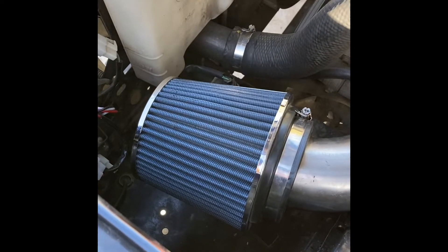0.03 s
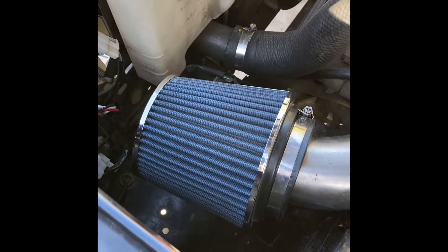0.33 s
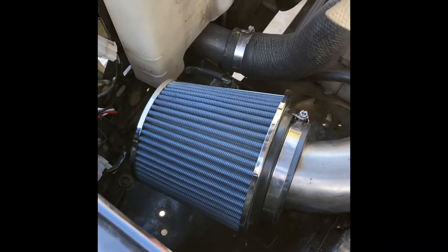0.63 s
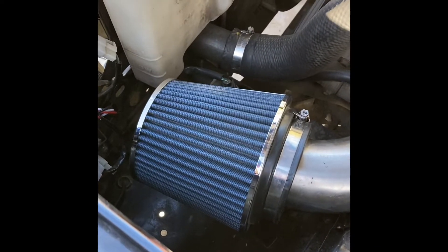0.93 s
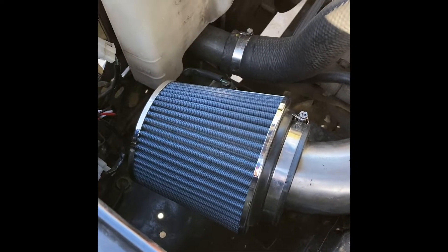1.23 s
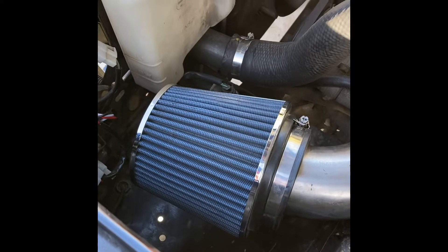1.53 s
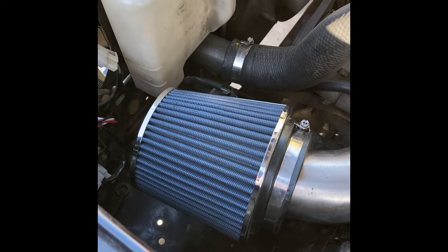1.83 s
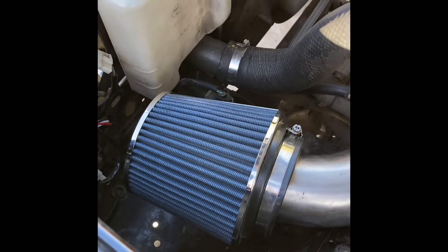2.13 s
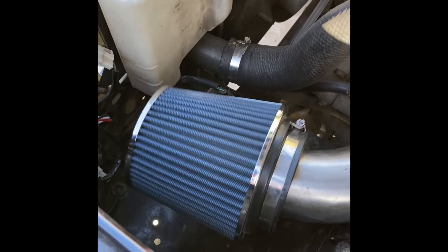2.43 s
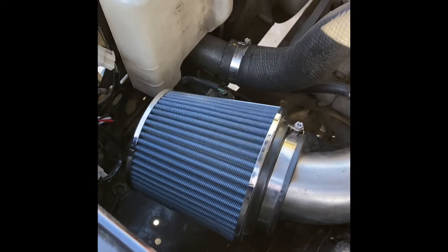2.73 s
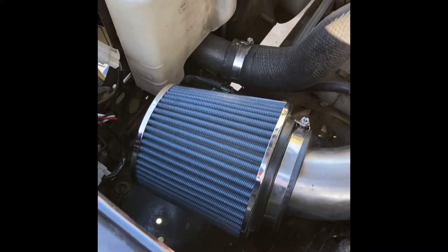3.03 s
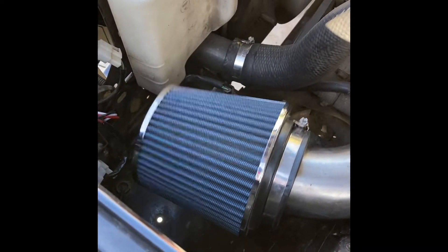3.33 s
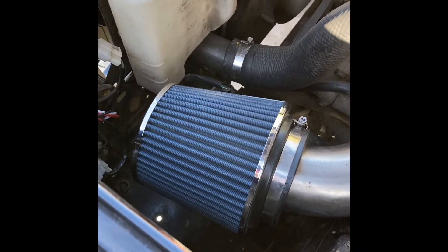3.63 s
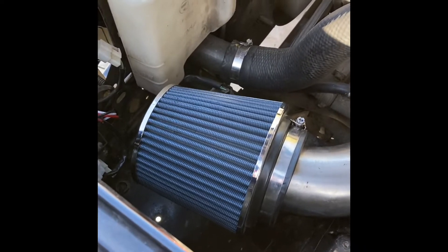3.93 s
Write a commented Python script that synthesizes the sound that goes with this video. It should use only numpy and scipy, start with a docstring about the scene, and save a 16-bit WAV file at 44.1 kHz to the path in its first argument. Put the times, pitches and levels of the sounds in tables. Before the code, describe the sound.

A turbocharged car engine revs four times, its intake fluttering after each throttle release.

```python
"""Turbo engine, four blips

In the engine bay of a turbocharged four-cylinder, a microphone pair close to the open cone filter.
On the throttle the intake burbles and the rush of air swells; at each lift the compressor surges and
chops the air into a dying run of chuffs, which buffet the microphones and end as soft pipe hoots."""
import sys
import numpy as np
from scipy import signal
from scipy.fft import rfft, irfft
from scipy.io import wavfile
from scipy.ndimage import uniform_filter1d

SR = 44100
rng = np.random.default_rng(int(sys.argv[2]) if len(sys.argv) > 2 else 0)


def generate_wav(sig):
    """Save sig (samples, or channels by samples) to the path in sys.argv[1] as 16-bit PCM at SR."""
    pcm = np.round(np.clip(np.atleast_2d(sig).T, -1, 1) * 32767).astype(np.int16)
    wavfile.write(sys.argv[1], SR, pcm)


N = 176400
T = np.arange(N) / SR
BINS = np.maximum(np.arange(N // 2 + 1) * SR / N, 1)

# Engine speed. Each row: time in seconds, firing rate in Hz.
FIRING_RATE = [(0.0, 97.3), (0.18, 115.9), (0.33, 141.8), (0.45, 149.4), (0.6, 138.7), (0.85, 120.6),
               (1.15, 106.8), (1.48, 86.2), (1.6, 88.8), (1.75, 103.4), (1.92, 126.7), (2.05, 116.6),
               (2.29, 106.6), (2.52, 130.9), (2.7, 116.8), (3.0, 100.6), (3.1, 109.4), (3.26, 128.8),
               (3.4, 117.8), (3.7, 101.8), (4.0, 87.7)]
# Exhaust hum. Each row: time in seconds, level in dB. Levels in all tables are relative.
EXHAUST_HUM = [(0,-29.5),(.2,-34),(.3,-43),(.45,-34.5),(.7,-42.5),(1.05,-33),(1.25,-41),(1.43,-51),(1.52,-39.5),(1.75,-32),(1.88,-38.5),(1.99,-25),(2.1,-39),(2.42,-38),(2.57,-26),(2.67,-39),(3.05,-34.5),(3.2,-43),(3.31,-24.5),(3.42,-34),(3.7,-46),(4,-53)]
# Open throttle. Each row: opening and shutting in seconds, level in dB, sag in dB per second.
BLIPS = [(-.05,0.502,-25,-39),(1.463,2.04,-29,-11),(2.27,2.609,-32.5,-12),(2.934,3.421,-28.5,-24),(3.963,4.1,-32,-3)]
# The burble swells just before a lift. Each row: time in seconds, gain in dB.
SWELLS = [(1.98,10.3),(2.559,11.7),(3.314,14)]
# Strength of the four intake strokes in dB.
CYLINDER_DB = [2.5, 1.5, -7.5, -9.5]
# Resonances of the intake. Each row: frequency in Hz, width in Hz, level in dB.
TRACT_MODES = [(215,95,-0.5),(267,95,-2.5),(314,77,-7.5)]
PIPE_MODES = [(489,40,2),(594,62,-3),(822,76,-0.5),(972,17,-2),(1212,36,3),(1317,16,2.5),(1632,52,-1.5),(1860,54,-1),(1966,63,0),(2198,20,-2),(2477,46,-3),(2765,36,1.5),(3644,69,-8),(4390,50,-5.5)]
HOOT_MODES = [(442,75,-8),(493,22,-0.5),(582.4,38,-7)]
# When each pipe mode rings. Each row: peak as a share of the chuff's length, spread in seconds.
PIPE_TIMING = [(0.49,0.011),(0.75,0.017),(1.1,0.011),(0.55,0.018),(0.33,0.0057),(1,0.014),(0.31,0.0075),(0.76,0.019),(0.38,0.014),(.65,0.019),(.65,0.0063),(0.76,0.017),(0.43,0.027),(0.25,.014)]
# Air drawn through the filter. Each row: time in seconds, rush in dB, hiss in dB.
SUCTION = [(0,-30.5,-33.5),(.2,-25.5,-28.5),(.45,-22,-28),(.51,-22,-26),(.59,-28.5,-31),(.93,-35,-34.5),(1.07,-29.5,-29.5),(1.3,-30,-34),(1.44,-34,-35.5),(1.5,-37,-40.5),(1.7,-32,-34),(1.97,-25.5,-27.5),(2.09,-28,-25),(2.26,-35.5,-37),(2.37,-29,-31),(2.57,-25.5,-29),(2.75,-28,-29),(2.94,-36.5,-37.5),(3.1,-32.5,-35.5),(3.34,-25,-27.5),(3.44,-29.5,-31),(3.7,-34,-32),(3.85,-34.5,-33),(4,-38,-40.5)]
# Surges back through the filter. Each row: start and length in seconds, body, hiss and puff in dB.
CHUFFS = [(0.51,0.052,-14.5,-16.5,-44),(0.596,0.061,-20.5,-21,-29),(0.686,0.047,-22,-23,-33.5),(0.781,0.04,-24,-25.5,-29),(0.87,0.03,-31,-25.5,-54),(0.964,0.018,-33,-25,-54),
          (2.018,0.042,-16,-18,-29),(2.107,0.038,-20,-21,-30.5),(2.186,0.047,-23.5,-23,-29.5),
          (2.596,0.055,-17.5,-21,-26.5),(2.692,0.033,-17,-19.5,-26.5),(2.778,0.031,-22,-21.5,-22.5),(2.863,0.031,-24.5,-21.5,-34),
          (3.36,0.046,-17.5,-21.5,-32),(3.45,0.04,-20,-20,-26),(3.538,0.038,-25.5,-22.5,-27.5),(3.631,0.021,-27,-22.5,-46),(3.721,0.018,-33.5,-25.5,-57)]
# Hiss as the blades stall ahead of a surge. Each row: start and length in seconds, level in dB.
SPITS = [(0.762,0.017,-27.5),(0.84,0.016,-27),(1.976,0.041,-20.5),(2.558,0.045,-21),(2.676,0.014,-19),(2.754,0.02,-23),(2.828,0.026,-25),(3.32,0.04,-20.5),(3.435,0.013,-21.5),(3.518,0.018,-24),(3.606,.014,-23.5),(3.688,0.012,-28)]
# Yelps as the flow turns round. Each row: peak time in seconds, pitch in Hz, level in dB.
YELPS = [(.57,1097,-10.5),(.656,1010,-14),(.737,884,-20),(.794,997,-18.5),(2.069,973,-15),(2.162,870,-20),(2.655,972,-10.5),(2.738,855,-16),(2.815,790.3,-16.5),(3.411,924,-12.5),(3.552,954,-17)]
# Weak surges that only ring the pipe. Each row: peak time in seconds, level in dB.
HOOTS = [(.89,-34),(0.982,-24.5),(1.061,-27),(1.145,-24.5),(1.225,-46),(2.119,-26),(2.206,-23),(2.702,-24),(2.88,-29.5),(3.664,-28.5),(3.745,-25.5),(3.83,-25),(3.904,-32.5)]
# The turbo's blade note. Each row: time in seconds, pitch in Hz.
WHISTLE_PITCH = [(0,16500),(1,16500),(1.09,14700),(1.276,12800),(1.35,12100),(1.45,11200),(1.54,11700),(1.63,14000),(1.75,17200),(3.7,16200),(3.82,14540),(4,12500)]
# Spectra of the noises. Each row: frequency in Hz, density in dB.
GROWL_COLOUR = [(40,-65),(140,-27),(200,-6),(260,3.5),(310,-6),(380,4),(490,-11.5),(620,-18),(1500,-63)]
RUSH_COLOUR = [(40,-42),(100,-8),(180,3.5),(300,1),(450,3.5),(570,-5.5),(700,-1),(880,1.5),(1050,-3.5),(1300,-6.5),(1550,-3.5),(2000,-2.5),(3000,-5.5),(4000,-10.5),(5000,-10),(9000,-16.5)]
HISS_COLOUR = [(2500,-78),(4500,-4),(5400,-25),(6200,-1),(7500,-1),(8400,2),(9700,3.5),(11000,3),(13000,-4),(15500,-8)]
RUMBLE_COLOUR = [(20,-38),(50,-16),(100,14.5),(170,-13),(250,-5),(340,-6),(470,9),(700,-9),(2000,-4.5),(8000,-50)]
ROAR_COLOUR = [(40,-55),(120,-25),(175,-8),(280,3),(400,-13),(550,-14),(680,4),(900,1),(1050,-10),(3000,-55)]
CHUFF_COLOUR = [(25,-35),(60,-22),(130,2.5),(280,4.5),(380,-4),(600,-3),(740,2),(1100,2.5),(1600,-3),(2200,-4),(3300,-5.5),(4500,-7),(6500,-7),(10000,-47)]
PUFF_COLOUR = [(15,-37),(30,-24),(50,3.5),(85,0.5),(140,-1.5),(250,-9),(400,-9.5),(900,-57)]
SIZZLE_COLOUR = [(3000,-40),(7000,-31),(11000,9),(13500,4.5),(15800,-2)]
# First reflections in the engine bay. Each row: delay in seconds, gain.
BAY_ECHOES = [(0.002177, 0.09), (0.003197, 0.04), (0.003991, 0.03), (0.004966, 0.13), (0.006122, 0.1),
              (0.007211, -0.05), (0.007846, -0.04), (0.008866, -0.028), (0.011, 0.035), (0.0142, 0.058)]
# Phase across the microphone pair. Each row: frequency in Hz, lead of the left in radians.
PAIR_PHASE = [(60,-.2),(250,-.7),(500,-1.5),(800,-2.4),(1100,-3),(1500,-3.6),(1900,-4.5),(2500,-3.9),(3200,-3.6),(4200,-4.3),(5200,-3.14),(5800,-3.1),(6600,-2.4),(7800,-.2),(9200,.1),(10300,1.8),(11300,3.1),(12400,3.2),(13200,4.6),(14000,6.2)]
# Likeness of the turbulence at the two microphones. Each row: frequency in Hz, coherence from 0 to 1.
PAIR_LIKENESS = [(100,1),(500,0.8),(1000,0.83),(1600,0.23),(2100,0.72),(4100,0.51),(5400,1),(6800,0.67),(8400,.995),(10200,1),(11800,1),(13200,0.99),(14500,0.82)]
# Balance of the pair. Each row: frequency in Hz, left minus right in dB.
PAIR_BALANCE = [(100,2),(240,2),(450,-2.5),(1000,-3),(1900,-3.5),(3200,0),(15000,0)]

THROTTLE_S = 0.0075   # how fast the throttle opens and shuts
ROUGH_HZ = 224   # how fast turbulent air flickers in level


def from_db(db):
    """Decibels to gain."""
    return 10 ** (np.asarray(db) / 20)


def rms_one(x):
    """Scale to unit level."""
    return x / np.sqrt(np.mean(x ** 2) + 1e-20)


def in_time(rows):
    """The columns of a curve at every sample."""
    times, *columns = np.transpose(rows)
    return [np.interp(T, times, column) for column in columns]


def by_bin(points):
    """A table over frequency at every bin."""
    hz, value = np.transpose(points)
    return np.interp(np.log(BINS), np.log(hz), value)


def noise(colour):
    """Noise with a given spectrum."""
    return rms_one(irfft(rfft(rng.standard_normal(N)) * from_db(by_bin(colour)), N))


def drift(hz):
    """Random motion up to about a given rate, spread 1."""
    return rms_one(irfft(rfft(rng.standard_normal(N)) / (1 + (BINS / hz) ** 2), N))


def roughen(air, depth_db):
    """Air with a fast random flicker, at unit level."""
    return rms_one(air * from_db(depth_db * drift(ROUGH_HZ)))


def resonate(x, modes):
    """Parallel resonances with alternating signs."""
    out = 0
    for k, (hz, width, db) in enumerate(modes):
        radius = np.exp(-np.pi * width / SR)
        feed = np.array([1, 0, -1]) * (1 - radius ** 2) / 2
        feedback = [1, -2 * radius * np.cos(2 * np.pi * hz / SR), radius ** 2]
        out = out + (-1) ** k * from_db(db) * signal.lfilter(feed, feedback, x + 1e-18)
    return rms_one(out)


def wander(hz, width):
    """A pipe note of fairly even strength whose pitch wavers about its resonance."""
    resonance = 1 / (1 + ((BINS - hz) / width) ** 2)
    note = signal.hilbert(irfft(rfft(rng.standard_normal(N)) * resonance, N))
    return rms_one(np.real(note) / np.sqrt(abs(rms_one(note)) + 0.1))


def bump(peak_s, spread_s):
    """A bell-shaped envelope."""
    return np.exp(-((T - peak_s) / spread_s) ** 2 / 2)


def gate(start, length, attack_s, release_s, sag_db_per_s):
    """Attack, sagging hold and release."""
    t = T - start
    hold = from_db(sag_db_per_s * np.clip(t - attack_s, 0, length))
    return np.clip(t / attack_s, 0, 1) * hold * np.exp(-np.maximum(t - length, 0) / release_s)


def bursts(rows, attack_s, release_s, sag_db_per_s, lag_s=0, arch_db=1.5):
    """Envelope of a run of surges, each arched in its middle."""
    out = 0
    for start, length, db in rows:
        progress = np.clip((T - start - lag_s) / (length + release_s), 0, 1)
        level = from_db(db + arch_db * (np.sin(np.pi * progress) - 0.94))
        out = out + level * gate(start + lag_s, length, attack_s, release_s, sag_db_per_s)
    return out


def intake(turns, jitter_s=0.0002, gulp_s=0.006, bark_db=2.5, bark_s=0.14, swell_s=0.04, coast_db=-54):
    """Each firing gulps air: a thump rings the tract and turbulence growls, loud on the throttle."""
    firings = np.flatnonzero(np.diff(np.floor(turns))) + 1
    slip, uneven = rng.standard_normal((len(firings), 2)).T
    onsets = np.clip(firings + (slip * jitter_s * SR).astype(int), 0, N - 1)
    cylinder_db = np.take(CYLINDER_DB, turns[firings].astype(int), mode="wrap")
    strokes = np.zeros(N)
    strokes[onsets] = from_db(cylinder_db + 0.6 * uneven)
    low_mids = signal.butter(2, [172, 435], "band", fs=SR, output="sos")
    burble = rms_one(signal.sosfilt(low_mids, resonate(strokes, TRACT_MODES)))
    gulps = signal.lfilter([1], [1, -np.exp(-1 / (gulp_s * SR))], strokes)
    growl = from_db(-13) * rms_one(gulps * noise(GROWL_COLOUR))
    throttle = 0
    for opens, shuts, db, sag in BLIPS:
        bark = bark_db * np.exp(-abs(T - opens) / bark_s)   # extra force as it snaps open
        throttle += from_db(db + bark) * gate(opens, shuts - opens, THROTTLE_S, THROTTLE_S, sag)
    swell = from_db(sum(db * np.exp(-((T - peak) / swell_s) ** 4) for peak, db in SWELLS))
    return (burble + growl * swell ** 0.55) * (throttle * swell + from_db(coast_db))


def exhaust(turns):
    """The exhaust hums underneath at the firing rate, its level wavering."""
    hum_db, = in_time(EXHAUST_HUM)
    return rms_one(np.sin(2 * np.pi * turns)) * from_db(hum_db + 1.06 * drift(hz=16))


def suction(turns, throb=0.08):
    """Air rushes and hisses through the filter, rings the pipe and throbs with the firings."""
    rush_db, hiss_db = in_time(SUCTION)
    flow = noise(RUSH_COLOUR) + from_db(-7.5) * resonate(rng.standard_normal(N), PIPE_MODES)
    rush = from_db(rush_db - 2.5) * roughen(flow, depth_db=0.7)
    hiss = from_db(hiss_db - 4.5) * noise(HISS_COLOUR)
    return (rush + hiss) * (1 + throb * np.cos(2 * np.pi * turns))


def rumble():
    """The steady low background of the engine bay."""
    return from_db(-42.5) * noise(RUMBLE_COLOUR)


def roar(turns, full_s=0.42, rise_db_per_s=90, throb=0.3):
    """At the top of the first blip the intake roars with the firings, until the throttle shuts."""
    build = from_db(-27.5 + rise_db_per_s * np.minimum(T - full_s, 0))
    still_open = np.clip((BLIPS[0][1] - T) / THROTTLE_S, 0, 1)
    return build * still_open * noise(ROAR_COLOUR) * (1 + throb * np.cos(2 * np.pi * turns))


def surge():
    """Air chuffs back out of the filter and stalling blades spit; the hiss starts more sharply."""
    starts, lengths, body_db, hiss_db, _ = np.transpose(CHUFFS)
    chuffs = bursts(zip(starts, lengths, body_db), attack_s=0.015, release_s=0.0036, sag_db_per_s=-10)
    edges = bursts(zip(starts, lengths, hiss_db), attack_s=0.0047, release_s=0.0038, sag_db_per_s=-27)
    spits = bursts(SPITS, attack_s=0.0098, release_s=0.0038, sag_db_per_s=-27)
    body = chuffs * roughen(noise(CHUFF_COLOUR), depth_db=2.5)
    hiss = (edges + spits) * roughen(noise(HISS_COLOUR), depth_db=2)
    return from_db(-3) * body + from_db(-1.5) * hiss


def pipe_ring(scatter_db=2.5):
    """As the flow turns round, each surge sounds the pipe's modes in turn, never twice alike."""
    starts, lengths, body_db, _, _ = np.transpose(CHUFFS)
    out = 0
    for (hz, width, db), (share, spread_s) in zip(PIPE_MODES, PIPE_TIMING):
        gains = from_db(body_db + db + scatter_db * rng.standard_normal(len(starts)))
        swells = sum(gain * bump(peak, spread_s) for gain, peak in zip(gains, starts + share * lengths))
        out = out + swells * wander(hz, width)
    return from_db(-13) * out


def puffs():
    """Expelled air buffets each microphone on its own, the right one harder."""
    starts, lengths, _, _, puff_db = np.transpose(CHUFFS)
    eddies = np.array([noise(PUFF_COLOUR), noise(PUFF_COLOUR)])
    eddies /= np.sqrt(uniform_filter1d(eddies ** 2, size=1300) + 0.041)   # evens out the force
    gusts = bursts(zip(starts, lengths, puff_db),
                   attack_s=0.0047, release_s=0.017, sag_db_per_s=-12, lag_s=0.012)
    return gusts * eddies * from_db([[-8], [1.5]])


def sizzle():
    """The hiss turns brightest where the reverse flow peaks, late in each chuff."""
    crests = sum(from_db(hiss_db + 0.5) * bump(start + 0.7 * length, spread_s=0.0064)
                 for start, length, _, hiss_db, _ in CHUFFS)
    return crests * noise(SIZZLE_COLOUR)


def yelps(spread_s=0.0088, fall_per_s=4.4, rough=0.47):
    """Strong surges blow breathy pipe notes that swell, sink in pitch and die."""
    breath = 1 + rough * (drift(hz=160) + 1j * drift(hz=160))
    notes = 0
    for peak, hz, db in YELPS:
        t = T - peak
        envelope = from_db(db) * bump(peak, spread_s) * (abs(t) < 3.9 * spread_s)
        notes = notes + envelope * np.exp(2j * np.pi * hz * (t - fall_per_s * t * t / 2))
    return from_db(-6) * np.real(notes * breath) / np.sqrt(1 / 2 + rough ** 2)


def hoots():
    """Weak surges softly sound the pipe's lowest resonances."""
    breath = rms_one(sum(from_db(db) * wander(hz, width) for hz, width, db in HOOT_MODES))
    swells = sum(from_db(db) * bump(peak, spread_s=0.017) for peak, db in HOOTS)
    return from_db(-4) * swells * breath


def whistle(edge_hz=15100, winding_up_db=-6):
    """The compressor's wavering blade note, heard below edge_hz and clearest as it winds down."""
    course, = in_time(WHISTLE_PITCH)
    winding_up = uniform_filter1d(1.0 * (np.gradient(course) > 0), size=2000)
    pitch = course * (1 + 0.009 * drift(hz=400))
    tone = np.sin(2 * np.pi * np.cumsum(pitch) / SR) * from_db(3.5 * drift(hz=25))
    in_range = np.clip((edge_hz - pitch) / 300, 0, 1)
    return from_db(-48.5 + winding_up_db * winding_up) * in_range * rms_one(tone)


def bay(air, wet_db=-6, decay_s=0.013):
    """Panels and hoses close by add a few echoes and a very short diffuse ring."""
    echoes = sum(gain * np.exp(-2j * np.pi * BINS * delay) for delay, gain in BAY_ECHOES)
    tail = rng.standard_normal(N) * np.exp(-T / decay_s)
    ring = from_db(wet_db) * rfft(tail / np.linalg.norm(tail))
    return irfft(rfft(air) * (1 + echoes + ring), N)


def microphones(direct, turbulence):
    """Sound reaches the close pair out of step; part of the turbulence differs between the two."""
    alike = by_bin(PAIR_LIKENESS)
    mid = rfft(direct) + np.sqrt((1 + alike) / 2) * rfft(turbulence[0])
    side = np.sqrt((1 - alike) / 2) * rfft(turbulence[1])
    lean = from_db(by_bin(PAIR_BALANCE) / 2) * np.exp(1j * by_bin(PAIR_PHASE) / 2)
    return irfft(np.array([(mid + side) * lean, (mid - side) / lean]), N)


def scene():
    """Engine, air and turbo over the rumble of the bay, from beside the filter."""
    turns = np.cumsum(in_time(FIRING_RATE)[0]) / SR   # one turn per firing
    turbulence = [bay(suction(turns) + roar(turns) + surge() + sizzle() + rumble()) for _ in range(2)]
    direct = intake(turns) + exhaust(turns) + yelps() + hoots() + pipe_ring() + whistle()
    return microphones(direct, turbulence) + puffs()


def record(dry):
    """The top is cut steeply above 15.9 kHz."""
    return signal.sosfilt(signal.ellip(12, 0.2, 80, 15900, fs=SR, output="sos"), dry)


dry = scene()
out = record(dry)
generate_wav(out)
```